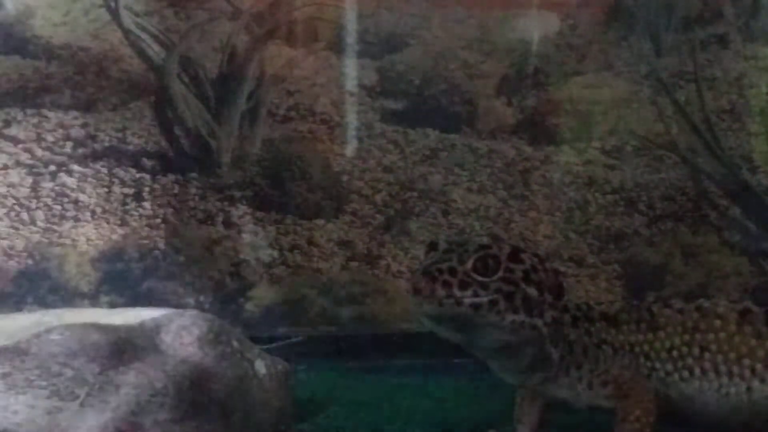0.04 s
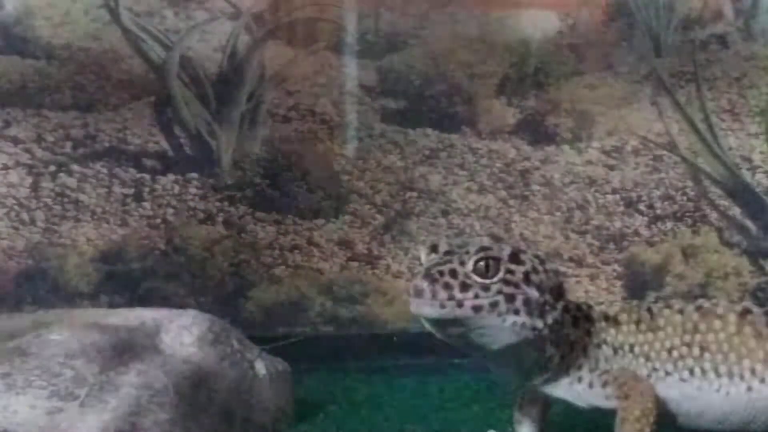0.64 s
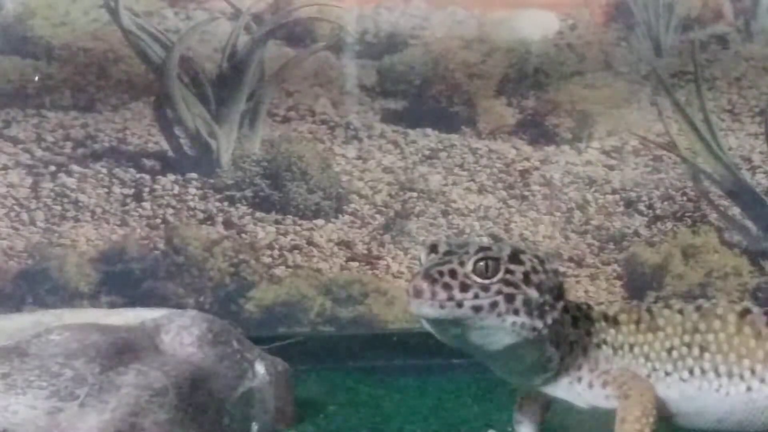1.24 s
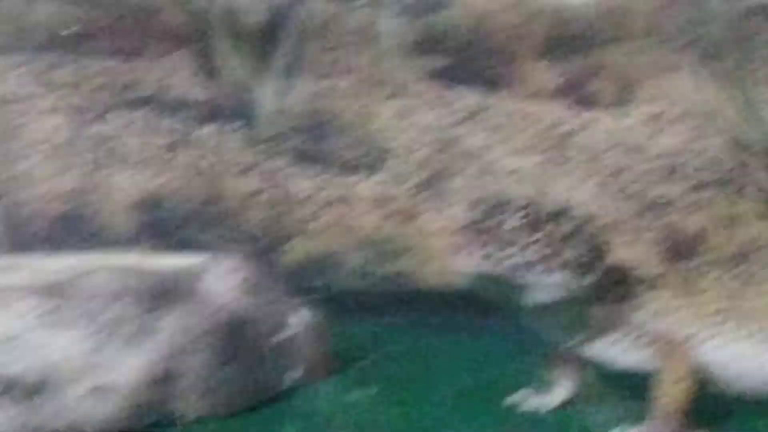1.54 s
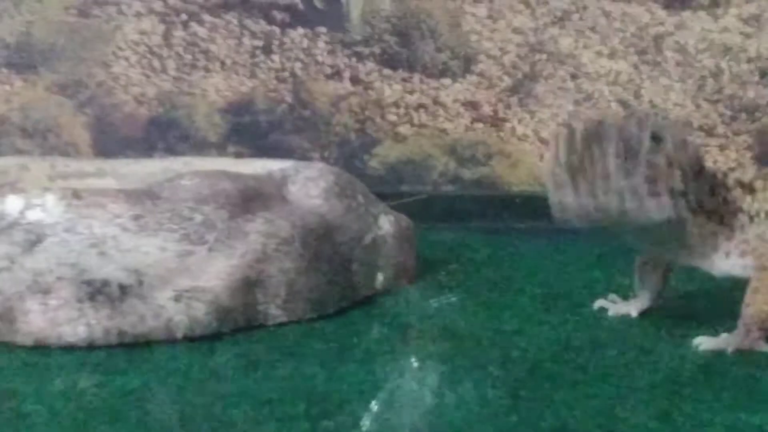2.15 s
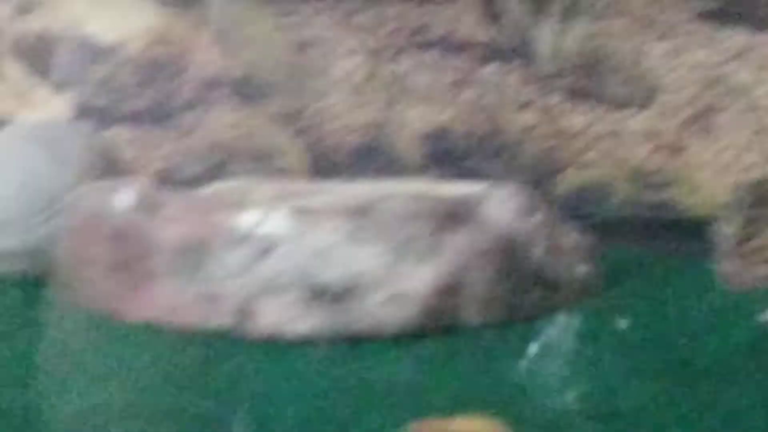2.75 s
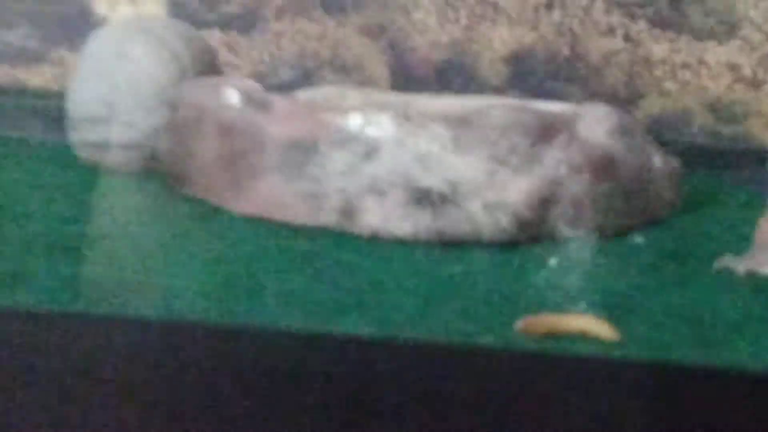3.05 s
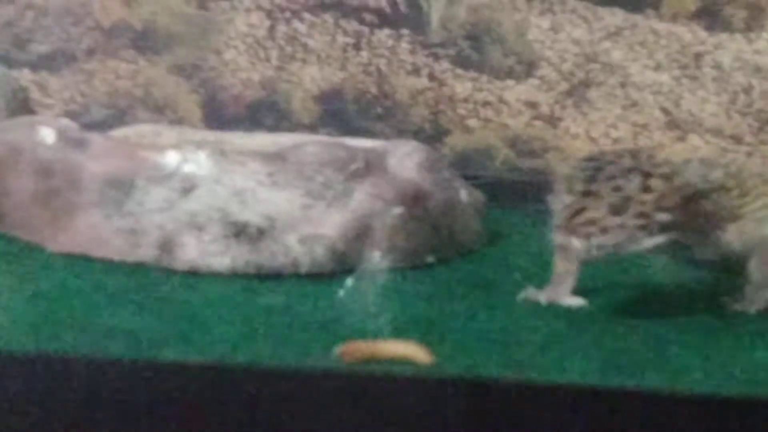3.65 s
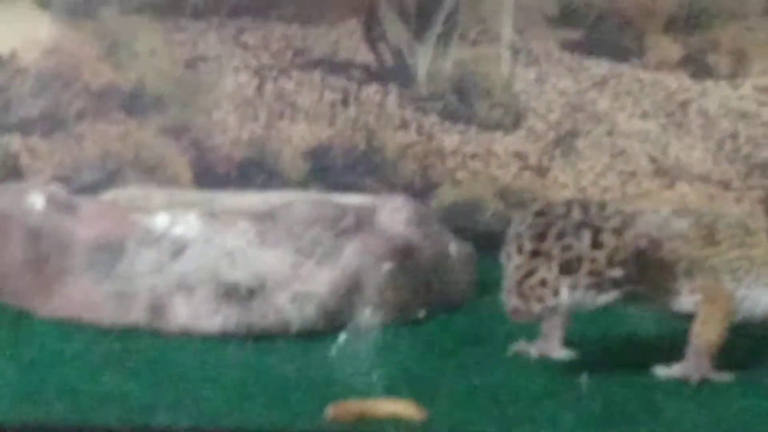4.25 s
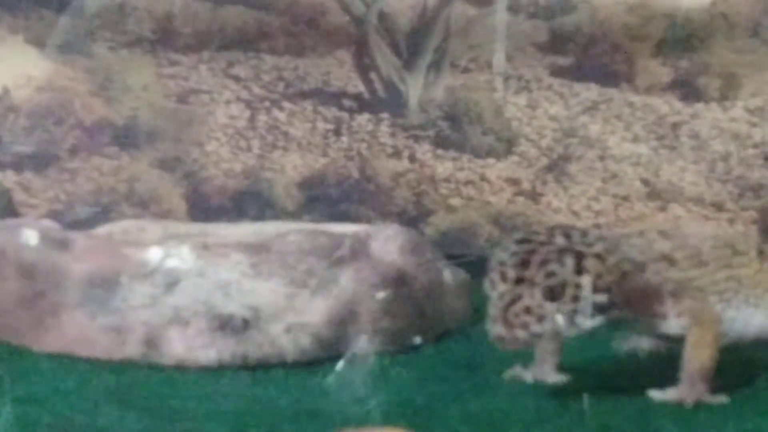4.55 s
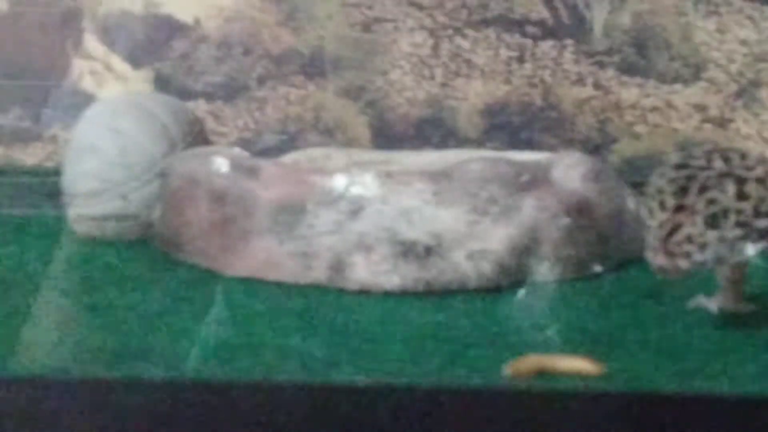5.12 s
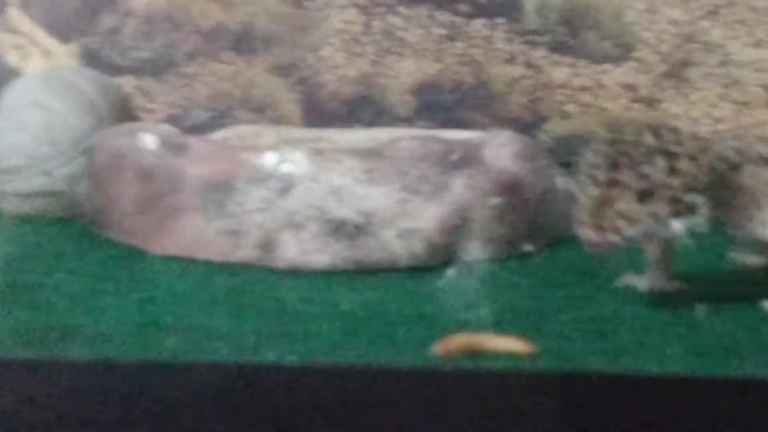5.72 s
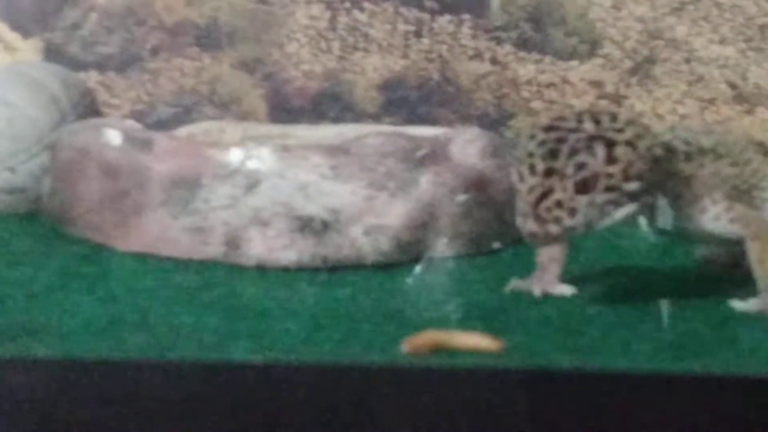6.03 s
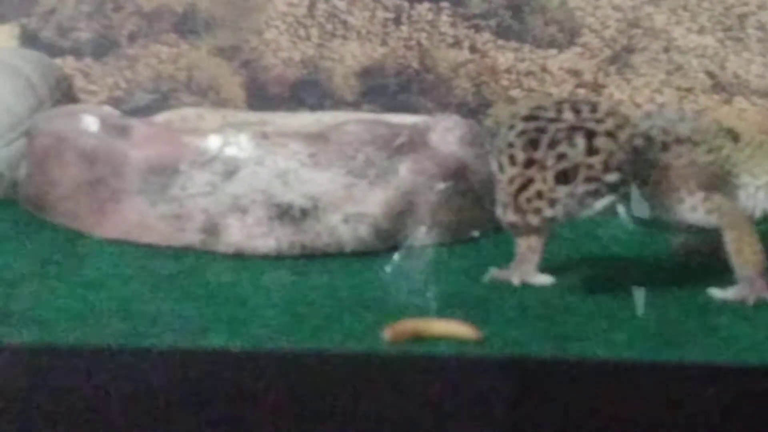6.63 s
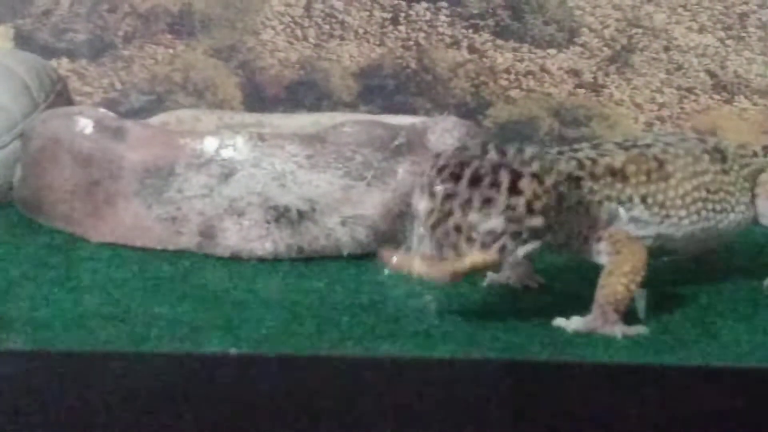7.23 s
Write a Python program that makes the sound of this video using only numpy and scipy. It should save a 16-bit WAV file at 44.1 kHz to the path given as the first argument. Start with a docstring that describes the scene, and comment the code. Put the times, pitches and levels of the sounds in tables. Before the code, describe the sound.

Close, crinkly plastic snaps and ticks come from a hand-held device while things are handled at a pet enclosure indoors. Faint knocks ring briefly in the room before the snaps build into a loud cluster with dull hand bumps on the microphone. Afterwards the ticks grow sparse and quieter. Soft rustling, faint scuffs and two tiny pings sit over low room rumble and hiss.

```python
"""Close, dry plastic snaps: a hand-held camera creaks and ticks beside a gecko's tank while mealworms
are handled and dropped in. Each snap is a sudden slip in a burst of tiny ones, coloured by the plastic.
Knocks farther off ring in a small room, the hand bumps the camera, and something hard pings twice.
Under them lie a soft rustle of movement, faint scuffs and squeaks, room rumble and microphone hiss."""
import sys
import numpy as np
from scipy import signal
from scipy.fft import rfft, irfft
from scipy.io import wavfile
from scipy.ndimage import uniform_filter1d

SR = 44100
rng = np.random.default_rng(int(sys.argv[2]) if len(sys.argv) > 2 else 0)


def store_wav(level_fs):
    """Save 16-bit WAV to argv[1]."""
    pcm = np.round(np.clip(np.atleast_2d(level_fs), -1, 1) * 32767)
    wavfile.write(sys.argv[1], SR, pcm.T.astype(np.int16))


N = 325458
TAPS = 4096

# Room rumble and microphone hiss. Each row: frequency in Hz, relative level in dB.
ROOM_SPECTRUM = [(15, -70), (25, -29), (70, -27), (92, -29), (220, 0.5), (304, -0.5), (422, -3),
                 (706, -3.5), (1220, -10.5), (4480, -19), (5720, -31), (7510, -31.5), (9580, -23),
                 (14800, -23), (16500, -32.5)]
# Room resonances. Each row: centre in Hz, half-width in Hz, boost in dB.
ROOM_RESONANCES = [(243, 21, 3.5), (358, 24, 3.5)]
# Briskness of the hand. Each row: time in seconds, level in dB.
HAND_MOVEMENT = [(0.0, -72), (0.9, -63.5), (1.17, -69), (2.22, -63.5), (2.4, -70.5), (2.67, -57.5),
                 (2.9, -54.5), (3.47, -66.5), (4.36, -71), (6.13, -70.5), (6.31, -71.5), (7.38, -74)]
# Sliding skin and cloth. Each row: frequency in Hz, relative level in dB.
RUSTLE_SPECTRUM = [(100, -18.5), (260, 6), (500, 1), (1200, -0.5), (1850, -5), (2900, 1.5), (3350, -0.5),
                   (3950, -4.5), (4450, -1), (5000, -2), (5900, -11.5), (6700, -4.5), (8000, -21.5),
                   (16000, -29)]
# Soft rubs. Each row: start and length in seconds, centre and half-width in Hz, level in dB.
SCUFF_EVENTS = [(0.311, 0.12, 5400, 940, -65), (0.342, 0.12, 1900, 1320, -62),
                (0.68, 0.69, 1300, 220, -65.5), (2.599, .9, 4460, 177.3, -65.5),
                (5.798, 0.084, 2450, 880, -58.5)]
# Thin squeaks. Each row: start and length in seconds, first and last pitch in Hz, level in dB,
# relative level of the octave below in dB.
SQUEAK_EVENTS = [(1.775, 0.092, 5660, 5380, -57.5, -30), (3.745, 0.069, 4930, 5070, -62.5, -2)]
# Blows on a hard object. Each row: start in seconds, level in dB.
PING_EVENTS = [(2.5364, -49), (6.723, -43.5)]
# Modes of that object. Each row: frequency in Hz, relative level in dB, T60 in seconds.
PING_MODES = [(2930, 0, 0.037), (2950, 3.5, 0.056), (4100, -7.5, 0.062), (4720, 0, 0.034), (5000, 0, .05),
              (5373, -9.5, 0.11), (6200, -10.5, .09), (7120, -12, 0.26), (7300, -12, 0.25),
              (9120, -24.5, .2), (11000, -20.5, .06)]
# Wall scatter of a ping. Each row: frequency in Hz, relative level in dB.
SCATTER_SPECTRUM = [(1500, -20.5), (3000, -8.0), (5000, 1), (8000, -13), (16000, -28.5)]
# Hand bumps on the camera. Each row: start in seconds, level in dB, frequency in Hz, T60 in seconds.
BUMP_EVENTS = [(2.046, -37.5, 308, 0.031), (2.237, -36, 264, 0.021), (2.738, -23.5, 208, 0.0098),
               (2.9474, -37, 229, 0.032), (3.001, -37, 248, 0.032), (3.851, -42, 275, 0.02),
               (6.667, -52, 189, 0.16)]
# Knocks on and around the tank. Each row: start in seconds, level in dB, T60 in seconds,
# dullness in dB, blow relative to tail in dB, main resonance in Hz.
KNOCK_EVENTS = [(0.1309, -49, 0.22, -1, 5.5, 3630), (0.1753, -54, 0.17, -1, 6, 3000),
                (0.5859, -61.5, 0.35, 12, 5, 1270), (0.645, -52.5, 0.65, 6.5, -23, 307),
                (0.759, -52, 0.17, -2.5, -12, 614), (1.0384, -39.5, .24, -2.5, 4.5, 1170),
                (1.3526, -43, 0.35, -2, 4, 4000), (2.0328, -44.5, 0.094, 1, -21, 3000),
                (2.089, -50.5, 0.15, 2, 9, 3540), (2.474, -42.5, 0.18, -3.5, -6, 4000),
                (2.537, -48, 0.35, -1, 7.5, 4826), (2.7437, -32, 0.25, -5, 1, 4800),
                (3.5668, -59.5, 0.22, -15, -14, 4500), (3.8514, -45.5, 0.053, 11, 9.5, 403),
                (5.8114, -46, 0.2, 10, -3, 780), (6.668, -57, 0.46, 7.5, -16, 250)]
# Colour common to all knocks. Each row: frequency in Hz, relative level in dB.
KNOCK_SPECTRUM = [(60, -9), (130, -6.5), (300, 6), (700, 0), (1400, 0.5), (2700, 0.5), (3700, -2.5),
                  (4900, -1.5), (6000, -14.5), (7800, -14), (11000, -13), (16000, -21)]
# Resonances of tank and lid. Each row: centre in Hz, half-width in Hz, boost in dB.
TANK_RESONANCES = [(1008, 110, 2), (1292, 61, 1.5), (1700, 50, 2.5), (4160, 59, 3.5), (6576, 960, 13.5),
                   (9250, 78, 9), (10150, 220, 8.5)]
# Ring of the plastic case. Each row: frequency in Hz, relative level in dB, T60 in seconds.
CASE_MODES = [(470, -41, 0.039), (1032, -41.5, 0.057), (1432, -28, 0.016), (3000, -35, 0.034),
              (4403, -44.5, 0.0085), (7150, -47, .045), (8920, -43, .04), (12300, -47.5, .035)]
# Colour common to all snaps. Each row: frequency in Hz, relative level in dB.
SNAP_SPECTRUM = [(400, -9), (1200, -6.5), (2200, -9.5), (4200, -2.5), (7000, -8.5), (9000, -15),
                 (12000, -18), (15500, -21), (17000, -28.5)]
# Close plastic snaps. Each row: time in seconds, gain in dB, burst decay in seconds, main resonance
# in Hz, then gains in dB for that resonance, the body, the brightness and the tank echo.
SNAP_EVENTS = [(1.51, -26.5, .003, 5100, 8, 1, -12, -6), (1.5885, -11, .0016, 5000, 10, 6, -7, 11),
               (1.608, -10, 0.00058, 1850, 12, 8, 8, 4), (1.7144, -20, .0006, 7070, 9, 2, 5.5, -8),
               (1.93, -18, 0.0021, 1230, 9, 12.5, -18, -7), (2.113, -1, 0.0014, 4420, 6.5, -2, 2.5, -2),
               (2.164, -6.5, 0.0013, 6400, 8.5, -6, -5, 4), (2.1844, -3, 0.0019, 3700, 9.5, 5.5, 11, 6),
               (2.2222, 0, 0.0033, 1160, 8.5, 7.5, -4.5, 7), (2.2345, -7.5, 0.00056, 4840, 4, 1, -12, 8),
               (2.341, -20.5, 0.0011, 2450, 19.5, -8, -18, -8),
               (2.3685, -6, 0.00055, 6000, 7.5, -0.5, -11, 6.5),
               (2.429, -16.5, 0.0041, 1320, 12, 9.5, -15, -4), (2.4587, 3, 0.0012, 3300, 11, -14, -1.5, -2),
               (2.4815, -13, .0005, 3400, 8, -4, -5, -4), (2.5263, 4, 0.00072, 2600, 8, -3, -5, -4),
               (2.5297, 1, 0.00083, 3500, 3, -6, 15, -12), (2.5318, 10, 0.0012, 1820, 13.5, -2, -15, -2),
               (2.5353, 8.5, 0.00092, 4860, 1, 3, 15, -14), (2.5361, 18, 0.00064, 4560, 3, -5, 0, -8),
               (2.544, -5, 0.00086, 2290, 15, 11.5, 32.5, -25), (2.651, -9.5, .0045, 1310, 2, 1, -12, -5),
               (2.678, -14.5, .003, 1250, 10, -2, -15, -6), (2.714, -18.5, .0019, 5200, 8, 4, 5, -5.5),
               (2.7437, 7, 0.0031, 1740, 10, -17, 0, -6), (2.748, 12.5, 0.00092, 7000, 5, -11, -11, -2),
               (2.7766, -2, 0.0024, 4900, 4, 0, -5, -6), (2.7994, -7.5, 0.00045, 6750, 17.5, -1, 20, -6),
               (2.809, 1, 0.003, 3300, 12, -6, 0, 12), (2.8514, -10.5, 0.00098, 3900, 9, 7, 0, -5),
               (2.854, -3.5, 0.00087, 6300, 10, 0, 0, 1), (2.9494, 4, 0.0013, 1180, 12, -1, -7.5, -1),
               (3.0003, -4.5, .0037, 1210, 8.5, 11, -6, -4), (3.106, 2.5, 0.0014, 1620, 7, 0.5, 2.5, -9),
               (3.2099, -5.5, .0027, 6200, 7.5, -4, -6.5, -9), (3.256, -18, 0.0013, 4100, 3, -10, -5, -4),
               (3.3496, 1, .0005, 3400, 0.5, -22.5, -14.5, 4.5),
               (3.48, -18, 0.0016, 8100, 9, 7.5, -3.5, -6), (3.5663, -17.5, 0.003, 1500, 14, -6.5, 2, -7),
               (3.618, -23, 0.0025, 3630, 8, 11, 8, -6), (3.6643, -10.5, 0.00066, 4330, 6, -3, -4.5, -1.5),
               (3.871, -21, .0027, 3220, 8, -4, -1, -6), (3.907, -11, 0.00052, 4840, 11.5, 2.5, 15.5, -7),
               (3.9128, -6, 0.00058, 4850, 5, -7, -10, -8), (4.0356, -1, 0.00037, 4450, 7.5, -2, 9.5, -4.5),
               (4.037, -2.5, 0.00084, 2750, 7.5, -2.5, 8, 4), (4.09, -25, .0012, 3800, 3, 12.5, -10, -7),
               (4.1367, -18, .0006, 5540, 7, 1, -7, -4), (4.15, -11, 0.0011, 3900, 8.5, 4.5, -14, -1),
               (4.156, -9, 0.00052, 7900, 5.5, -7, 6.5, -1),
               (4.3838, -9, 0.001, 2620, 7.5, -9.5, 7.5, -5.5),
               (4.63, -5.5, 0.00062, 3400, 10, -5, -11, -6), (4.702, -22, .0021, 2630, 9, -1, 8, -5),
               (4.8396, -25, 0.0027, 1296, 13.5, 4, 4, -7), (4.909, -28.5, .001, 3250, 10, 1, 0, -8),
               (4.9616, -8, 0.0011, 2280, 25, -4.5, -16, -2), (5.065, -32.5, .0006, 5900, 9.5, 1, -1, -6),
               (5.1975, -1, 0.0016, 1050, 14.5, -7.5, -8.5, 4), (5.2367, -10.5, 0.0013, 2890, 4, -6, -2, 3),
               (5.447, -10.5, 0.0021, 5900, 5, -2, -5.5, 11), (5.4615, 0, 0.0014, 4950, 5, 1, 0, 3),
               (5.571, -28, .0004, 5400, 12.5, -6, -3.5, -6), (6.034, -8.5, .0015, 3000, 2.5, -2, -3.5, 7),
               (6.302, -30.5, .001, 4850, 12.5, 9, -3, -7), (7.3677, -13, .0024, 1107, 10, -0.5, -19, -4)]


def gain(db):
    """Decibels to amplitude."""
    return 10 ** (np.asarray(db) / 20)


def unit_rms(x):
    """Scales to rms 1."""
    return x / np.sqrt(np.mean(x ** 2) + 1e-20)


def spectrum_db(points, hz):
    """Interpolates a spectrum on a log frequency axis."""
    point_hz, point_db = np.transpose(points)
    return np.interp(np.log(hz + 1), np.log(point_hz + 1), point_db)


def bell(hz, centre_hz, half_width_hz):
    """Resonance shape, 1 at its centre."""
    return 1 / (1 + ((hz - centre_hz) / half_width_hz) ** 2)


def resonances_db(rows, hz):
    """Summed boost of several resonances."""
    return sum(db * bell(hz, centre_hz, half_width_hz) for centre_hz, half_width_hz, db in rows)


def low_shelf(hz, corner_hz):
    """1 well under the corner, 0 well over it."""
    return 1 / (1 + (hz / corner_hz) ** 4)


def add(mix, start_s, sound):
    """Mixes a sound in at start_s."""
    part = mix[max(round(start_s * SR), 0):][:len(sound)]
    part += sound[:len(part)]


def noise(colour_db, size):
    """Coloured noise of rms 1."""
    return unit_rms(irfft(rfft(rng.standard_normal(size)) * gain(colour_db), size))


def minimum_phase(db):
    """Frequency response of a passive body: sharp start, ringing end."""
    log_gain = np.log(gain(np.r_[db, db[-2:0:-1]]))
    return np.exp(np.conj(signal.hilbert(log_gain)))[:len(db)]


def ring(modes, t):
    """Decaying sines, struck a little differently each time."""
    out = np.zeros(len(t))
    for hz, db, t60_s in modes:
        envelope = gain(db + rng.normal(0, 1.4) - 60 * t / t60_s)
        out += envelope * np.sin(2 * np.pi * (hz * t + rng.random()))
    return out


def movement_db(time_s):
    """Briskness of the hand at time_s."""
    return np.interp(time_s, *np.transpose(HAND_MOVEMENT))


def room_tone(rms_db=-62.5):
    """Steady room rumble and microphone hiss."""
    hz = np.fft.rfftfreq(N, 1 / SR)
    return gain(rms_db) * noise(spectrum_db(ROOM_SPECTRUM, hz) + resonances_db(ROOM_RESONANCES, hz), N)


def rustle(still_db=-73, floor_db=-79, catches_per_s=45, catch_db=13, spread_db=4):
    """Skin and cloth slide: soft hiss with tiny catches, both following the movement."""
    power = gain(movement_db(np.arange(N) / SR)) ** 2 - gain(still_db) ** 2
    envelope = np.sqrt(np.maximum(power, gain(floor_db) ** 2))
    caught = rng.random(N) < catches_per_s / SR
    catches = caught * gain(catch_db + spread_db * np.minimum(rng.exponential(1, N), 4))
    friction = envelope * (rng.standard_normal(N) + catches)
    body = irfft(minimum_phase(spectrum_db(RUSTLE_SPECTRUM, np.fft.rfftfreq(TAPS, 1 / SR))))
    return signal.oaconvolve(friction, body / np.linalg.norm(body))[:N]


def scuffs():
    """Brief rubs through one resonance, swelling and fading."""
    out = np.zeros(N)
    for start_s, length_s, centre_hz, half_width_hz, db in SCUFF_EVENTS:
        n = round(length_s * SR)
        rub = noise(20 * np.log10(bell(np.fft.rfftfreq(n, 1 / SR), centre_hz, half_width_hz)), n)
        swell = np.sin(np.pi * np.linspace(0, 1, n) ** 1.2)
        add(out, start_s, gain(db) * swell * rub)
    return out


def squeaks(waver=0.012, arch=0.022):
    """Thin tones that arch in pitch, waver and fade."""
    out = np.zeros(N)
    for start_s, length_s, first_hz, last_hz, db, octave_db in SQUEAK_EVENTS:
        progress = np.linspace(0, 1, round(length_s * SR))
        swell = np.sin(np.pi * progress)
        wobble = unit_rms(uniform_filter1d(rng.standard_normal(len(progress)), size=60))
        hz = (first_hz + (last_hz - first_hz) * progress) * (1 + arch * swell + waver * wobble)
        phase = 2 * np.pi * np.cumsum(hz) / SR
        add(out, start_s, gain(db) * swell * (np.sin(phase) + gain(octave_db) * np.sin(phase / 2)))
    return out


def pings(scatter_db=-3, scatter_s=0.008):
    """A hard object rings; nearby walls scatter its first milliseconds."""
    out, t, hz = np.zeros(N), np.arange(SR // 2) / SR, np.fft.rfftfreq(SR // 2, 1 / SR)
    envelope = gain(scatter_db) * np.exp(-t / scatter_s)
    for start_s, db in PING_EVENTS:
        scatter = envelope * noise(spectrum_db(SCATTER_SPECTRUM, hz), len(t))
        add(out, start_s, gain(db) * (ring(PING_MODES, t) + scatter))
    return out


def bumps(rise_s=0.00089):
    """The hand pushes the camera: low, damped tones."""
    out, t = np.zeros(N), np.arange(TAPS) / SR
    for start_s, db, hz, t60_s in BUMP_EVENTS:
        envelope = gain(db - 60 * t / t60_s) * (1 - np.exp(-t / rise_s))
        add(out, start_s, envelope * np.sin(2 * np.pi * hz * t))
    return out


def knocks(blow_s=0.0025, treble_db=-8.5, resonance_db=7, split_hz=3000, treble_damping=0.25):
    """A short blow, then the diffuse tail of tank and room, whose treble dies first."""
    out, t, hz = np.zeros(N), np.arange(SR // 2) / SR, np.fft.rfftfreq(SR // 2, 1 / SR)
    tank_db = spectrum_db(KNOCK_SPECTRUM, hz) + resonances_db(TANK_RESONANCES, hz)
    lowpass = signal.butter(1, split_hz, fs=SR, output="sos")
    bass, treble = bell(hz, 0, 800), 1 - bell(hz, 0, 4000)
    for start_s, db, t60_s, dull_db, blow_db, main_hz in KNOCK_EVENTS:
        tilt_db = 0.75 * dull_db * bass + (treble_db - 0.99 * dull_db) * treble
        colour_db = tank_db + tilt_db + resonance_db * bell(hz, main_hz, 0.21 * main_hz)
        wash = noise(colour_db, len(t))
        lows = signal.sosfilt(lowpass, wash)
        decay_db = -60 * t / t60_s
        tail = gain(decay_db) * (lows + (wash - lows) * gain(treble_damping * decay_db))
        blow = gain(blow_db) * np.exp(-t / blow_s) * noise(colour_db, len(t))
        add(out, start_s, gain(db) * (tail + blow))
    return out


def slip_force(burst_s, echo_db, lead_s=0.0002, rise_s=0.00022, tank_s=0.0079, room_s=0.096, wall_hz=6000):
    """One slip inside a burst of tiny ones, plus echoes and the ring of the case."""
    t = np.arange(TAPS) / SR
    slip = np.arange(TAPS) == round(lead_s * SR)
    # a brief swell of noise softens the start of the click
    burst = 0.4 * (1 - np.exp(-t / rise_s)) * np.exp(-t / burst_s) * rng.standard_normal(TAPS)
    walls = signal.butter(1, wall_hz, fs=SR, output="sos")
    echo_envelope = gain(-35) * np.exp(-t / tank_s) + gain(-54) * np.exp(-t / room_s)
    echoes = signal.sosfilt(walls, echo_envelope * rng.standard_normal(TAPS))
    return slip + burst + gain(echo_db) * echoes + ring(CASE_MODES, t)


def snap(db, burst_s, main_hz, main_db, body_db, bright_db, echo_db, body_hz=1700, bright_hz=7500):
    """A slip, whitened except for fine ripple, then coloured by the spot of plastic that gives way."""
    hz = np.fft.rfftfreq(TAPS, 1 / SR)
    force = rfft(slip_force(burst_s, echo_db))
    trend_db = 10 * np.log10(uniform_filter1d(abs(force) ** 2, size=101))
    spot_db = main_db * bell(hz, main_hz, 0.25 * main_hz)
    spot_db += body_db * low_shelf(hz, body_hz) + bright_db * (1 - low_shelf(hz, bright_hz))
    radiation_db = -20 * np.log10(1 + (260 / (hz + 40)) ** 2)  # a small part radiates little bass
    sheen_db = (0.14 * bright_db + 0.55 * max(db, -5)) * bell(hz, 15300, 1300)  # sharp, hard slips
    colour_db = spectrum_db(SNAP_SPECTRUM, hz) + spot_db + radiation_db + sheen_db
    fade = np.minimum(np.linspace(2, 0, TAPS), 1)
    return fade * irfft(force * minimum_phase(db + colour_db - trend_db))


def ticks(from_s=1.7, to_s=5.2, per_s=7, centre_hz=4000, spread_octaves=0.37):
    """Tiny snaps from random spots of the plastic, louder as the hand moves more briskly."""
    out = np.zeros(N)
    for slot_s in np.arange(from_s, to_s, 1 / per_s):
        late, size, pitch, body, bright = rng.uniform(-1, 1, 5)
        start_s = slot_s + 0.5 * late / per_s
        db = movement_db(start_s) + 36.5 + 6 * size
        tick = snap(db, burst_s=0.001, main_hz=centre_hz * 2 ** (spread_octaves * pitch), main_db=6,
                    body_db=4 * body, bright_db=4 * bright, echo_db=-2.5)
        add(out, start_s, tick)
    return out


def snaps(lead_s=0.0002):
    """The camera's plastic creaks: clear snaps, bunched around the drop, then scattered."""
    out = np.zeros(N)
    for time_s, *settings in SNAP_EVENTS:
        add(out, time_s - lead_s, snap(*settings))
    return out


def microphone(x, ceiling=0.9, corner_hz=145, leak_db=-23):
    """The small microphone rounds off peaks and passes little deep bass."""
    rounded = ceiling * np.tanh(x / ceiling)
    highpass = signal.butter(6, corner_hz, "highpass", fs=SR, output="sos")
    return signal.sosfilt(highpass, rounded) + gain(leak_db) * rounded


def scene():
    """Handling sounds over the room tone, in mono."""
    handling = snaps() + knocks() + bumps() + pings() + rustle() + scuffs() + squeaks() + ticks()
    return (microphone(handling) + room_tone())[None]


def record(dry, edge_hz=16900):
    """Band limit."""
    lowpass = signal.firwin(255, edge_hz, window=("kaiser", 10), fs=SR)
    return signal.oaconvolve(dry, lowpass[None], "same")


dry = scene()
out = record(dry)
store_wav(out)
```